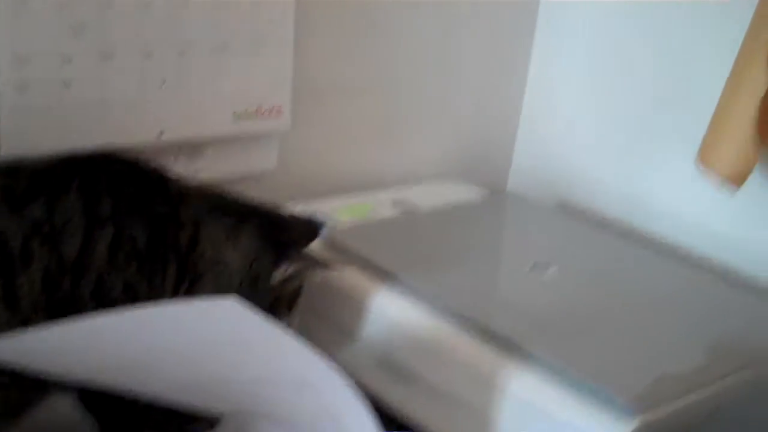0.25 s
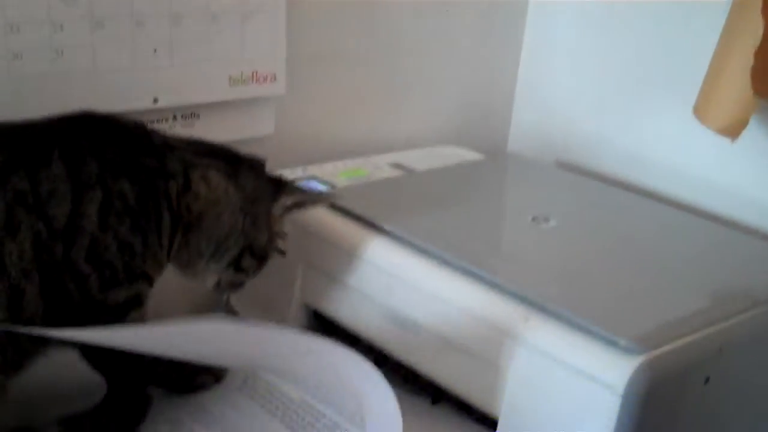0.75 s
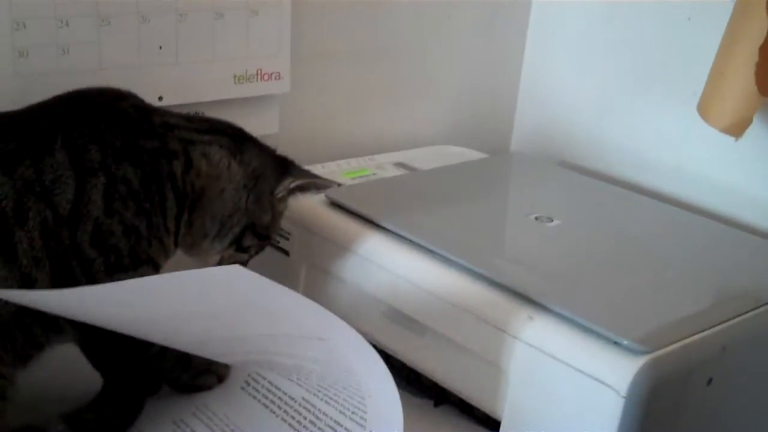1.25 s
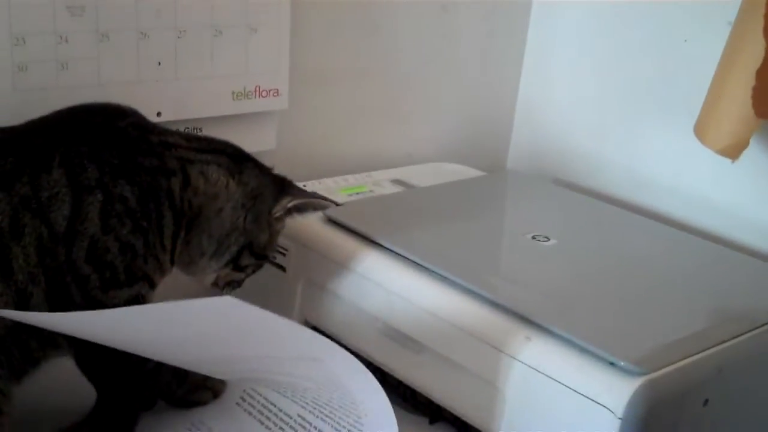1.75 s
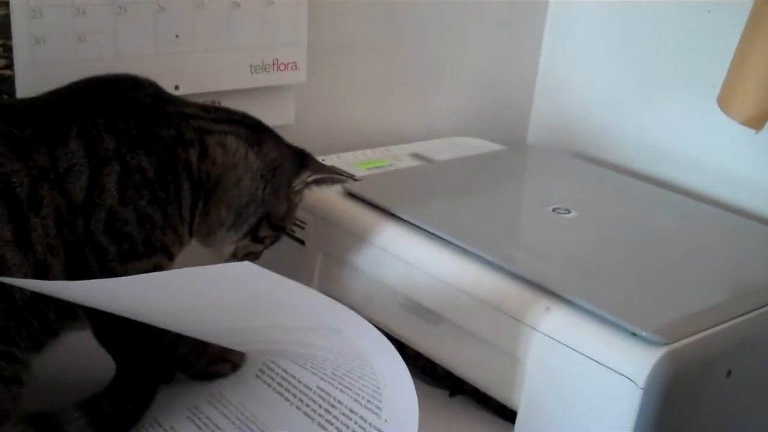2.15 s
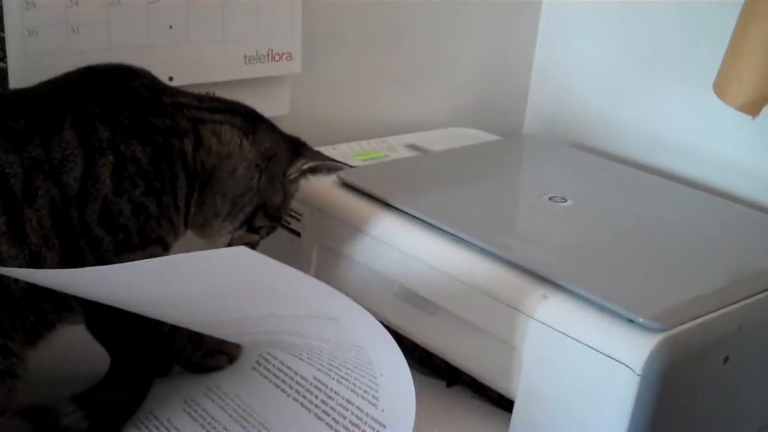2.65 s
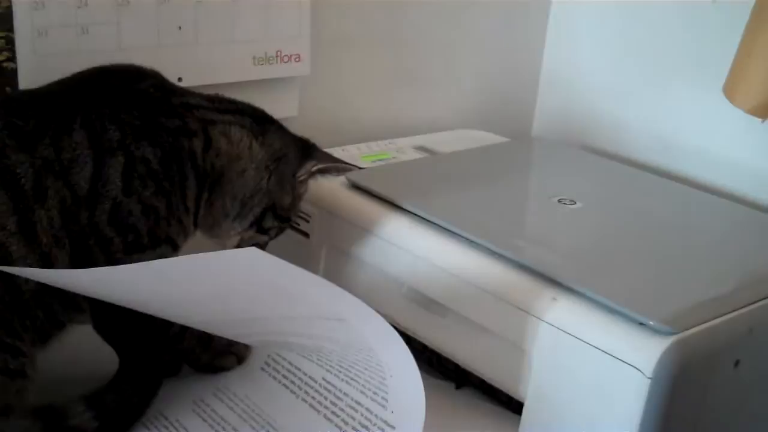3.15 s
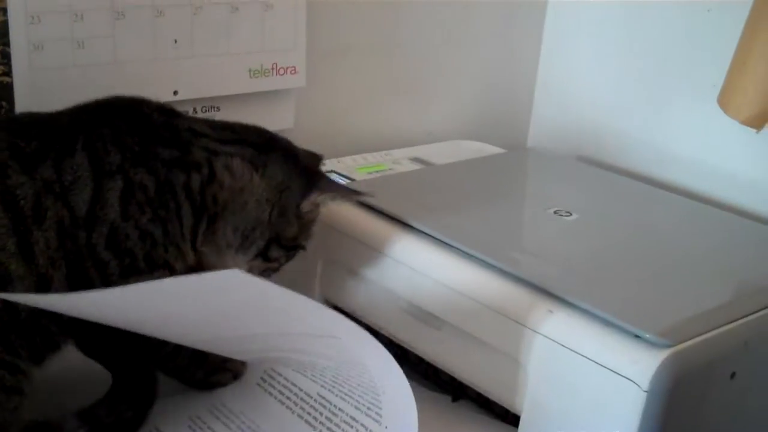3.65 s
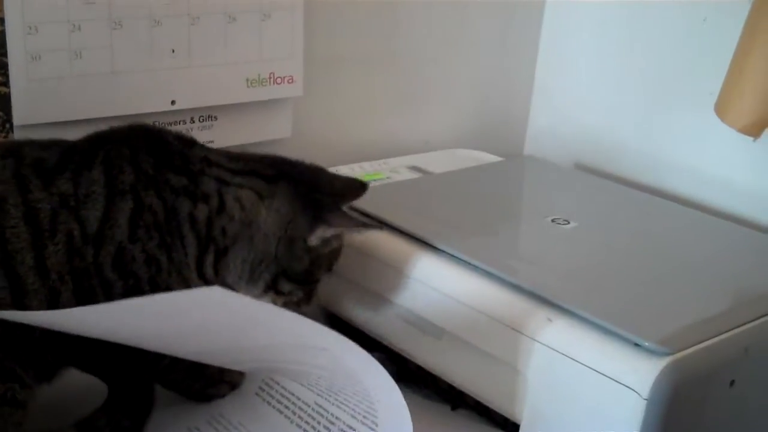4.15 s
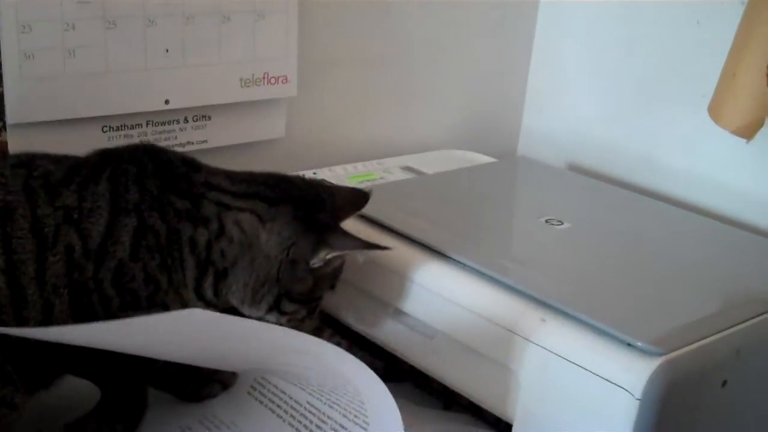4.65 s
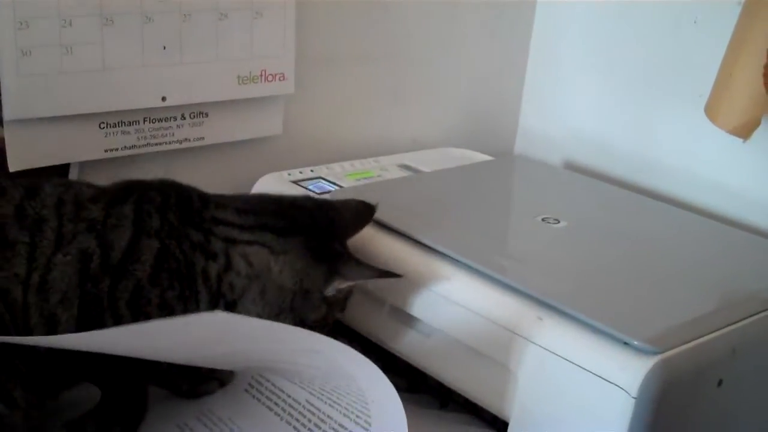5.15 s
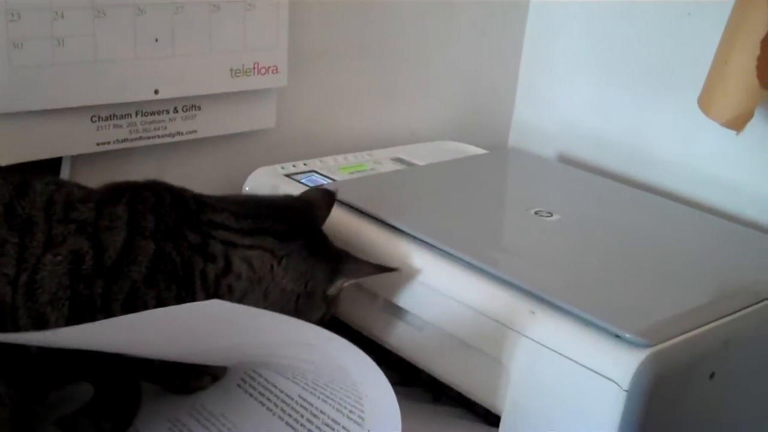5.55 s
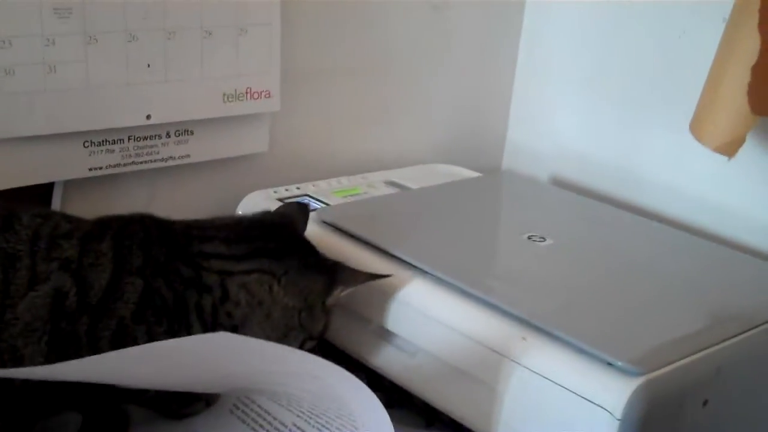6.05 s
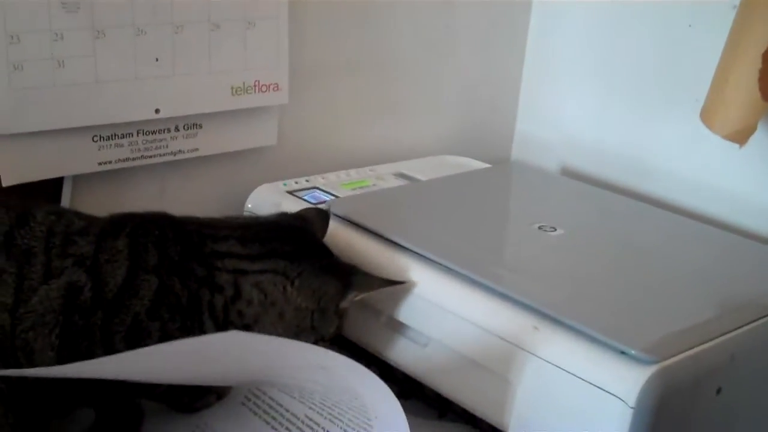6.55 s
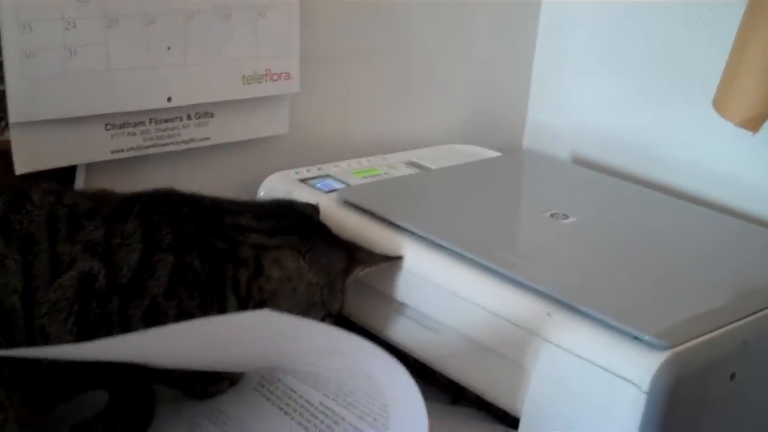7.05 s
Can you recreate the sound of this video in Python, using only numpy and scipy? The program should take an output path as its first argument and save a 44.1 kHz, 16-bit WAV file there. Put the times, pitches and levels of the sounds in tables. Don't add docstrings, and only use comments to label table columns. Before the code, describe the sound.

A close, dry capture of a desktop printer: sharp gear clacks, low knocks through the desk and a wavering motor whirr with a brief roller whine. Lighter feed clicks follow, then the motor cuts out. Near-silence, then one crisp paper crack and irregular scratchy strokes, flexes and small snaps as a cat paws the sheet, over soft appliance hum.

```python
import sys
import numpy as np
from scipy import signal
from scipy.fft import rfft, irfft
from scipy.io import wavfile
from scipy.ndimage import uniform_filter1d

SR = 44100
rng = np.random.default_rng(int(sys.argv[2]) if len(sys.argv) > 2 else 0)


def boost(x):
    u = np.asarray(x, float) / 20
    return 10 ** u


def store_pcm(level_fs):
    pcm = np.round(np.clip(level_fs, -1, 1) * 32767).astype(np.int16)
    wavfile.write(sys.argv[1], SR, np.atleast_2d(pcm).T)


N = 321921
HZ = np.fft.rfftfreq(N, 1 / SR)
T = np.arange(N) / SR
HIT_SAMPLES = 8000

# (time [s], struck piece level [dB], port ring level re piece [dB], piece pitch [Hz])
PICKUP_CLACKS = [(0.317, -39, -11, 4600), (0.337, -24, -6.5, 2100), (0.344, -23, -2, 2530),
                 (0.351, -36, 5, 840), (0.418, -17.5, 3.5, 4300), (0.419, -17.5, -27, 1180),
                 (0.483, -33, 5, 1140), (0.886, -30.5, -18, 2650), (0.931, -34, -20, 1160),
                 (0.963, -25, -5, 1110), (0.977, -16.5, -12, 980), (0.979, -18, -18, 2980),
                 (1.026, -17.5, -26, 3260), (1.042, -19.5, -13, 1160), (1.059, -24, -26, 1180),
                 (1.192, -35.5, -11, 1240), (1.253, -30, -12, 2710), (1.267, -32, -6, 1175),
                 (1.311, -43, -28, 2330)]
FEED_CLACKS = [(1.563, -39, -3, 4000), (1.66, -37, 8, 2000), (1.74, -36.5, -0.5, 3120),
               (1.892, -40.5, -24, 980), (2.013, -36, -6, 2500), (2.0135, -34.5, -20, 5200),
               (2.062, -28.5, -31, 3050), (2.079, -33.5, -17, 2400), (2.149, -36, -6, 1500),
               (2.154, -28, -4, 2280), (2.164, -33, -12, 2200), (2.25, -26.5, 2.5, 5000),
               (2.292, -38, 4.5, 1850), (2.326, -33, -9, 2100), (2.376, -36.5, 2, 1200),
               (2.402, -35, -14, 2220), (2.424, -35.5, -8, 1140), (2.483, -19, -8.5, 1200),
               (2.489, -24.5, -6, 2150), (2.546, -29.5, -4.5, 1210), (2.592, -24.5, -7.5, 3020),
               (2.609, -25.5, -30, 1320), (2.667, -29.5, -11, 1150)]
PAW_SNAPS = [(3.732, -38, -23, 2430), (3.894, -56, 6, 930), (3.992, -38, -12, 1500),
             (4.057, -40.5, -3, 4000), (4.136, -38.5, -10, 4080), (4.165, -40.5, -23, 1130),
             (4.356, -35, 5, 4750), (4.384, -35, -11, 1074), (4.468, -34, -17, 1120),
             (4.534, -51, -17, 1070), (4.802, -45, -15, 2950), (4.803, -29, -14, 4560),
             (4.811, -40, -10, 2990), (4.819, -33, -26, 2970), (4.944, -40, 6, 4510),
             (4.986, -38, 4.5, 3080), (5.047, -43, 0, 3000), (5.113, -38, -6, 5370),
             (5.121, -45.5, 15.5, 4180), (5.163, -43, 8, 1110), (5.506, -38.5, 3, 1546),
             (5.507, -46, -20, 870), (5.529, -46, 7, 980), (5.822, -38.5, 4.5, 2530),
             (6.404, -44, -8, 2500), (6.42, -47.5, -2, 2600), (6.885, -49, -20, 1510),
             (6.699, -54, 0, 1060), (7.058, -40, 11.5, 2560)]
FLAT_SNAPS = [(3.709, -19, -8, 1370), (3.7095, -17.5, -36, 4060), (3.711, -26, -36, 2880),
              (6.791, -33, -7, 5000), (6.8, -38, -6, 5500), (6.839, -33, -2, 6000),
              (6.843, -26.5, -14, 4680), (6.851, -28.5, -23, 5000), (6.897, -31.5, 6.5, 1790)]
TAB_PLUCKS = [(1.3115, -32, -23, 1475), (2.545, -27.5, -12, 1104), (2.667, -37, -20, 1014),
              (4.139, -46, -20, 4020), (4.802, -31.5, -20, 2910), (4.811, -36, -17, 2900),
              (4.82, -36, -20, 2920), (6.404, -46, -3, 2530), (6.414, -47.5, -1, 2490)]
# (broad crack share [0-1], decay t60 [s], mode width re pitch [ratio])
PICKUP_RING = (0.58, 0.07, 0.33)
FEED_RING = (0.47, 0.065, 0.35)
PAW_RING = (0.57, 0.047, 0.096)
FLAT_SNAP_RING = (0.89, 0.026, 0.26)
TAB_RING = (0.2, 0.04, 0.1)

# (time [s], peak level [dB], centre [Hz], decay t60 [s])
TICKS = [(0.3175, -11, 5700, 0.02), (0.484, -13, 7040, 0.03), (1.1925, -8, 2290, 0.018),
         (1.3125, -7, 2190, 0.067), (6.405, -34, 2510, 0.035), (0.4207, 1.5, 7250, 0.018),
         (0.9777, -11, 7200, 0.017), (1.027, -2.5, 7950, 0.042), (1.6593, -4, 6800, 0.017),
         (2.2492, -10.5, 7600, 0.027), (2.4843, -4, 7360, 0.026), (2.5934, -18, 7510, 0.015),
         (3.71, -1, 6060, 0.0084), (4.299, -11, 8550, 0.026), (4.802, -5.5, 6300, 0.019),
         (6.843, -8, 6000, 0.022), (6.8975, -11, 7350, 0.018), (7.058, -17, 7300, 0.025)]
# (time [s], peak level [dB])
SPARKS = [(0.4207, -42), (0.9777, -50), (1.6593, -37), (2.2495, -41), (2.4843, -42), (2.5934, -48),
          (3.71, -50), (4.299, -41), (4.802, -54)]

# (time [s], peak level [dB], case pitch [Hz], decay t60 [s])
THUMPS = [(0.344, -28, 655, 0.17), (0.359, -18.5, 393, 0.059), (0.418, -17, 670, 0.023),
          (0.42, -17, 248, 0.14), (0.499, -33.5, 295, 0.36), (0.54, -37, 402, 0.07),
          (0.888, -31, 403, 0.11), (0.981, -22.5, 371, 0.3), (0.975, -30.5, 157, 0.32),
          (1.03, -27.5, 159, 0.24), (1.03, -26, 580, 0.066), (1.049, -35.5, 604, 0.31),
          (1.277, -27.5, 412, 0.028), (1.312, -31.5, 392, 0.13)]
BUMPS = [(2.159, -31, 560, 0.16), (2.4, -33.5, 640, 0.28), (2.486, -23.5, 596, 0.11),
         (2.544, -21, 606, 0.095), (2.667, -29, 600, 0.13), (3.706, -37.5, 626, 0.19),
         (3.999, -47, 350, 0.11), (4.391, -42, 283, 0.13), (4.479, -48, 407, 0.11), (5.164, -41, 580, 0.12),
         (5.507, -39.5, 582, 0.27), (5.51, -44, 293, 0.15), (6.845, -39, 420, 0.07)]
# (desk boom level re peak [dB], lid share [ratio])
PICKUP_BODY = (-33.5, 0.15)
LATER_BODY = (-64, 0.2)

# (start [s], hold [s], hum level [dB], gear mesh level re hum [dB])
MOTOR_RUNS = [(0, 0.024, -64, -12), (.2, 0.17, -60.5, -11), (.4, 0.079, -39.5, -2.5),
              (.56, 0.27, -56.5, -6), (.93, 0.17, -42.5, -5), (1.15, 0.11, -57, -11),
              (1.29, 0.035, -44.5, 3), (1.33, 0.75, -51.5, 2), (2.02, 0.49, -47.5, -3.5),
              (2.53, 0.075, -41.5, -24), (2.63, 0.077, -47, -25)]
# (frequency [Hz], level [dB per Hz])
MOTOR_HUM = [(35, -54), (60, -42), (219, -4.5), (279, -11), (317, -13), (404, -2.5), (435, -4), (584, -5.5),
             (641, -9.5), (1340, -12), (5000, -68), (6500, -29), (11000, -120)]
# (frequency [Hz], level [dB])
GEAR_TONES = [(441.4, -59), (586.8, -58), (888.2, -61), (1314, -65), (1534, -66), (2083, -62.5),
              (2363, -62)]
# (time [s], level [dB])
ROLLER_COAST = [
    (.48, -88),
    (.55, -33),
    (.8, -41),
    (.88, -51),
]

# (start [s], hold [s], hiss level [dB], scrape level re hiss [dB])
SHEET_DRAGS = [(.345, 0.019, -45, 10), (.435, 0.017, -40.5, 3), (.47, 0.1, -56, 0), (.56, 0.31, -62, 3),
               (.94, 0.01, -51, 6), (.99, 0.0076, -50, -7), (1.043, 0.011, -43.5, 9.5),
               (1.09, 0.082, -68, -4), (1.265, 0.086, -55.5, 1), (1.34, 1.0, -57, 5),
               (2.085, 0.0084, -51.5, -7), (2.165, 0.0081, -52, 6), (2.385, 0.053, -48.5, -1),
               (2.5, 0.0063, -45, 8.5), (2.603, 0.014, -49, 15), (2.65, 0.052, -64, -17)]
PAW_STROKES = [(0.078, 0.09, -49, -1), (3.691, 0.0074, -45.5, -15), (3.711, 0.029, -56.5, 13.5),
               (4.004, 0.034, -55.5, 3), (4.13, 0.021, -55, 5), (4.241, .01, -53, -14),
               (4.345, 0.12, -43, -9), (4.47, 0.016, -50, 2.5), (4.792, 0.05, -46, -10.5),
               (4.857, 0.13, -49.5, -8.5), (4.974, .18, -43.5, -9), (5.15, 0.024, -61, 14),
               (5.503, 0.062, -60, 2), (5.815, 0.033, -52.5, -3.5), (5.876, 0.037, -46.5, -12),
               (5.97, 0.18, -61.5, -2), (6.262, 0.098, -59, -1.5), (6.41, 0.013, -65, 2.5),
               (6.87, 0.04, -47, 1.5), (6.958, 0.083, -53.5, -5), (7.026, 0.17, -45, -10.5)]
# (frequency [Hz], level [dB per Hz])
PAPER_HISS = [(2060, -22.5), (3500, -14.5), (4880, -6), (5460, -5), (7470, 2), (9860, -15.5), (13900, -27),
              (14600, -41), (14900, -70), (15300, -73)]
# (frequency [Hz], level [dB per Hz])
PAPER_SCRAPE = [(90, -52), (300, -6), (900, -6.5), (1500, -2.5), (3000, -4), (4500, -11.5), (6000, -47)]

# (start [s], hold [s], shiver level [dB], sway level re shiver [dB])
DESK_TREMBLES = [
    (.44, 0.097, -59, -1),
    (.6, 0.17, -68, -15),
    (1.0, .1, -68, -10),
    (1.17, 0.32, -68, -10),
    (3.7, .06, -69, -10),
    (4.95, 0.24, -71.5, -7),
]

# (frequency [Hz], level [dB per Hz])
ROOM_WASH = [(15, -34), (25, -8.5), (77, -13.5), (107, -11), (329, 0), (386, -7.5), (736, -5.5), (989, -10),
             (2970, -18.5), (3590, -18.5), (4570, -20.5), (8700, -23.5), (13000, -23.5), (14100, -24),
             (15300, -59)]
# (frequency [Hz], level [dB])
ROOM_TONES = [(280, -69), (328, -103), (748, -67.5), (1050, -67.5), (1394, -101), (1604, -84), (1922, -89),
              (2950, -71.5), (4400, -74)]

# (frequency [Hz], likeness [0 to 1], below 0 counts as 0)
NEAR_SAME = [(60, 0.54), (150, 1.), (600, 1), (1200, 1), (2200, 0.74), (3500, 0.93), (6000, 0.094),
             (14000, 0.21)]
ROOM_SAME = [(60, -0.73), (180, 0.99), (540, 0.71), (1640, 0.44), (4930, -1), (14800, -0.0015)]
# (frequency [Hz], level [dB])
NEAR_LEFT = [(60, -2), (130, 0), (290, 1.5), (640, -0.5), (1400, 1), (3070, 2.5), (6750, 3.5), (14800, 43)]
ROOM_LEFT = [(60, -3.5), (150, 2), (380, 1.5), (940, 0), (2360, 3.5), (5920, -0.5), (14800, -2)]


def clatter():
    kinds = [(PICKUP_CLACKS, hit, PICKUP_RING), (FEED_CLACKS, hit, FEED_RING),
             (PAW_SNAPS, hit, PAW_RING), (FLAT_SNAPS, hit, FLAT_SNAP_RING), (TAB_PLUCKS, hit, TAB_RING),
             (TICKS, tick, ()), (SPARKS, spark, ()),
             (THUMPS, thump, PICKUP_BODY), (BUMPS, thump, LATER_BODY)]
    out = np.zeros((2, N + HIT_SAMPLES))
    for table, sound, shared in kinds:
        for time_s, *row in table:
            start = round(time_s * SR)
            out[:, start:start + HIT_SAMPLES] += sound(*row, *shared)
    return out[:, :N]


def hit(db, ring_db, hz, crack_share, t60, width):
    chatter = burst(0.0012, t60, snap=0.68)
    rebounds = evened(uniform_filter1d(rng.standard_normal(HIT_SAMPLES), size=50))
    chatter = chatter * boost(0.5 * rebounds)

    port_hz = 7300
    ring = resonate_twice(chatter, port_hz, 1440)
    ring = ring + 0.074 * resonate(resonate(chatter, 10200, 5500), 8900, 7000)

    band = [max(600, 0.44 * hz), min(6500, 3.33 * hz)]
    crack = signal.sosfilt(signal.butter(3, band, "band", fs=SR, output="sos"), chatter)

    modes = [(1, 1), (1.35, 0.3), (1.8, 0.3)]
    piece = sum(gain * resonate_twice(chatter, ratio * hz, width * hz) for ratio, gain in modes)

    crack_share = np.clip(crack_share, 0, 1)
    struck = (1 - crack_share) * evened(piece) + crack_share * evened(crack)
    return peaked(struck, db + 0.5) + peaked(ring, db + ring_db + 2.5)


def tick(db, hz, t60):
    crack = resonate_twice(burst(0.00013, t60), hz, 3400)
    softened = signal.sosfilt(signal.butter(2, 9500, fs=SR, output="sos"), crack)
    return peaked(softened, db - 18.0)


def spark(db):
    treble = signal.butter(2, 9000, "high", fs=SR, output="sos")
    return peaked(signal.sosfilt(treble, burst(0.00015, 0.0098)), db)


def thump(db, hz, t60, boom_db, lid_share):
    push = burst(0.00032, t60)
    walls = resonate_twice(push, hz, 0.21 * hz) + 0.5 * resonate_twice(push, 460, 870)
    lid = resonate_twice(push, 238, 80)
    boom = resonate(resonate(burst(0.022, 2.0 * t60), 76, 44), 74, 41)
    boom_tilt_db = 6 * np.log2(hz / 400)
    return peaked(walls + lid_share * lid, db - 0.5) + peaked(boom, db + boom_db + boom_tilt_db - 5.5)


def motor():
    runs = held(MOTOR_RUNS, rise_db_per_s=274, fall_db_per_s=225, bow_db=0.9)
    load, meshed = runs * boost(0.8 * wander(16))
    hum = load * 0.92 * colour(rng.standard_normal((2, N)), MOTOR_HUM)

    shaft_level = boost(-4.5 + 3 * wander(12))
    shaft_hz = 319 + 5 * wander(6)
    shaft = shaft_level * np.sin(2 * np.pi * np.cumsum(shaft_hz) / SR)
    gears = sum(tones([(hz, db)], 6 + 0.012 * hz) for hz, db in GEAR_TONES)
    mesh = meshed * (boost(48) * gears + shaft)

    coast_db = np.interp(T, *np.transpose(ROLLER_COAST))
    whine = boost(coast_db) * tones([(1375, -23.0), (2000, -27)], 120)
    return hum + mesh + whine


def paper():
    strokes = held(SHEET_DRAGS + PAW_STROKES, rise_db_per_s=366, fall_db_per_s=349, bow_db=2.5)
    hiss, scrape = strokes + boost(-72)
    catches = boost(0.81 * np.minimum(rng.exponential(1, N), 4))
    catches = catches * (rng.random(N) < 500 / SR)
    grain = signal.oaconvolve(catches, np.exp(-np.arange(400) / 60.0))[:N]
    rub = rng.standard_normal((2, N)) * (1 + 0.5 * evened(grain)) * boost(0.5 * wander(29))
    return boost(2.0) * hiss * colour(rub, PAPER_HISS) + boost(-3.0) * scrape * colour(rub, PAPER_SCRAPE)


def desk():
    shiver, sway = held(DESK_TREMBLES, rise_db_per_s=300, fall_db_per_s=150, bow_db=1.5)
    return shiver * tones([(78, 0)], 43) + sway * tones([(35, 0)], 25)


def room():
    wash_level = boost(-58 + 0.16 * wander(25.0))
    wash = wash_level * colour(rng.standard_normal((2, N)), ROOM_WASH)
    tone_level = boost(-4 + wander(3))
    return wash + tone_level * sum(tones([(hz, db)], 4 + 0.006 * hz) for hz, db in ROOM_TONES)


def ports(pair, same, left_db):
    lag_s = 4.5e-5
    first, second = rfft(pair)
    likeness = np.clip(read(same, HZ), 0, 1)
    left_gain = boost(read(left_db, HZ))
    left = left_gain * first * np.exp(-2j * np.pi * HZ * lag_s)
    right = likeness * first + np.sqrt(1 - likeness ** 2) * second
    loudness = np.sqrt(1 + left_gain ** 2 + 2 * likeness * left_gain)
    return irfft(np.array([left, right]) * 2 / loudness, N)


def held(rows, rise_db_per_s, fall_db_per_s, bow_db):
    power = np.zeros((2, N))
    for start, hold, db, second_db in rows:
        through = np.clip((T - start) / hold, 0, 1)
        rise_db = rise_db_per_s * np.maximum(start - T, 0)
        fall_db = fall_db_per_s * np.maximum(T - start - hold, 0)
        main_db = db - rise_db - fall_db - bow_db * (2 * through - 1) ** 2
        power += boost(2 * (main_db + np.array([[0], [second_db]])))
    return np.sqrt(power)


def burst(rise, t60, snap=0.0):
    t = np.arange(HIT_SAMPLES) / SR
    decay = boost(-60 * t / max(t60, 0.01)) + 0.023 * boost(-60 * t / 0.32)
    fade_out = np.cos(0.5 * np.pi * t / t[-1])
    shape = (1 - np.exp(-t / rise)) * decay * fade_out
    return rng.standard_normal((2, len(t))) * (shape + snap * np.exp(-t / 0.00049))


def resonate(x, hz, width):
    b, a = signal.iirpeak(hz, hz / width, SR)
    return signal.lfilter(b, a, x)


def resonate_twice(x, hz, width):
    return resonate(resonate(x, hz, width), hz, width)


def tones(lines, width):
    return sum(boost(db) * evened(resonate(rng.standard_normal((2, N)), hz, width)) for hz, db in lines)


def colour(x, points):
    return evened(irfft(rfft(x) * boost(read(points, HZ)), N))


def wander(hz):
    return evened(irfft(rfft(rng.standard_normal(N)) / (1 + (HZ / hz) ** 2), N))


def read(points, hz):
    f, value = np.transpose(points)
    return np.interp(np.log(hz + 1), np.log(f + 1), value)


def evened(x):
    return x / np.sqrt(np.mean(x ** 2) + 1e-20)


def peaked(x, db):
    return boost(db) * x / abs(x).max()


def scene():
    near = clatter() + motor() + paper() + desk()
    return ports(near, NEAR_SAME, NEAR_LEFT) + ports(room(), ROOM_SAME, ROOM_LEFT)


def top_cut(x):
    return signal.sosfilt(signal.butter(12, 16800, fs=SR, output="sos"), x)


def record(dry):
    edge_hz, top_hz = 14300, 16500
    limited = signal.oaconvolve(dry, signal.firwin(255, edge_hz, fs=SR)[None], "same")
    top_band = signal.firwin(255, [edge_hz, top_hz], pass_zero=False, fs=SR)
    top = signal.oaconvolve(dry, top_band[None], "same")
    power = (top ** 2).mean(0)
    quick = uniform_filter1d(power, size=128)
    slow = uniform_filter1d(power, size=2048)
    opens = (quick > boost(2 * -63)) & (quick > 4.5 * slow)
    gate = uniform_filter1d(1.0 * opens, size=128)
    return top_cut(limited + 0.5 * top * gate)


dry = scene()
out = record(dry)
store_pcm(out)
```